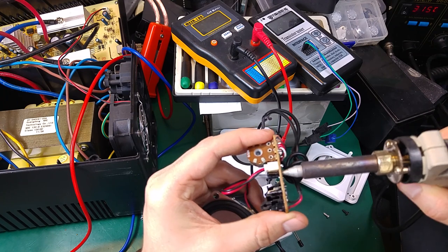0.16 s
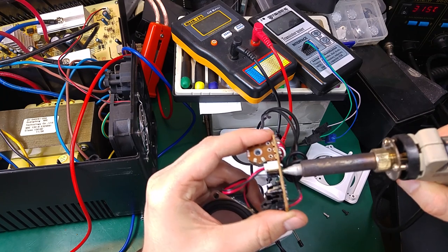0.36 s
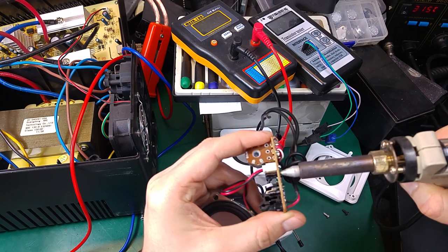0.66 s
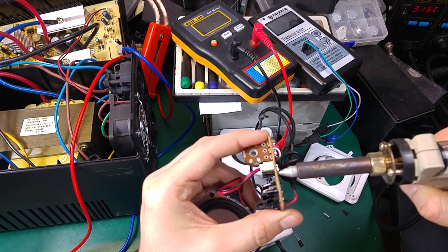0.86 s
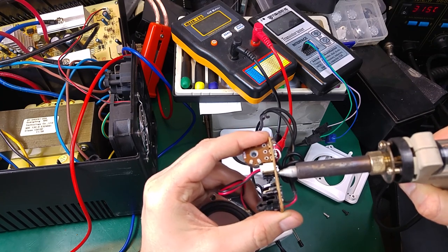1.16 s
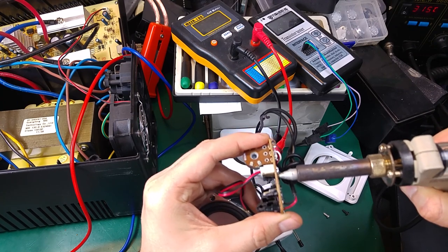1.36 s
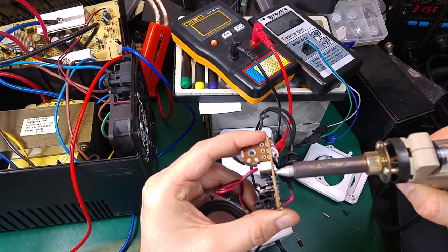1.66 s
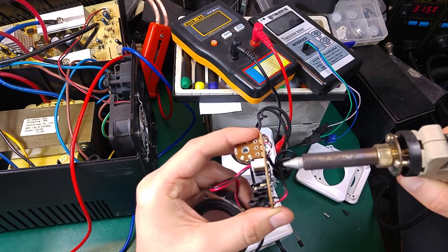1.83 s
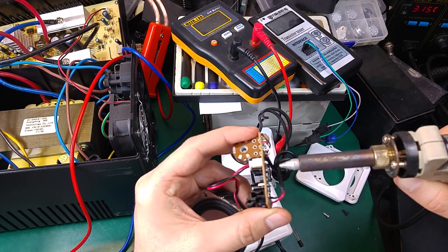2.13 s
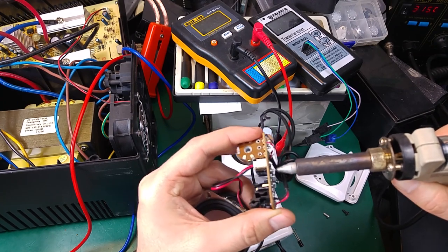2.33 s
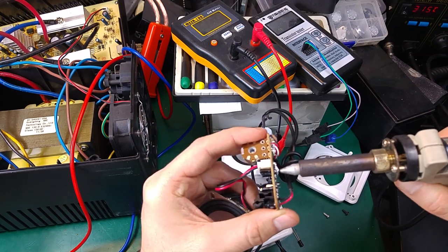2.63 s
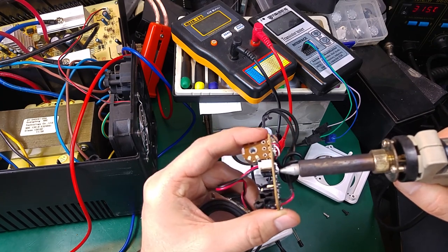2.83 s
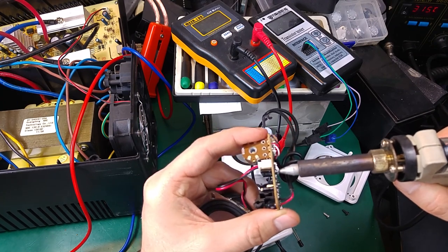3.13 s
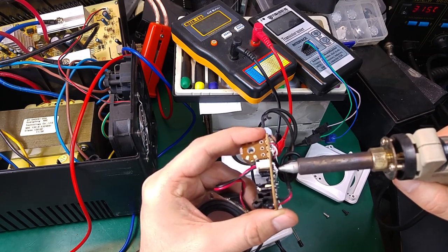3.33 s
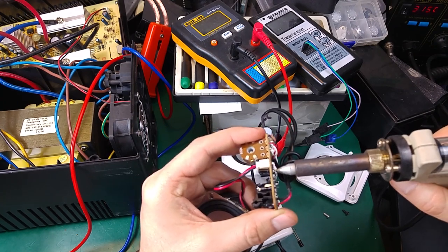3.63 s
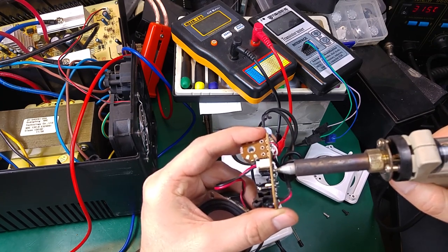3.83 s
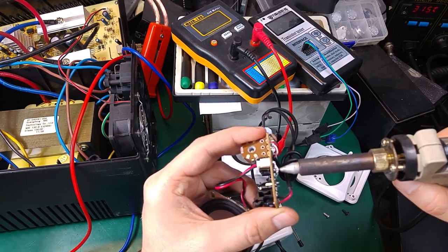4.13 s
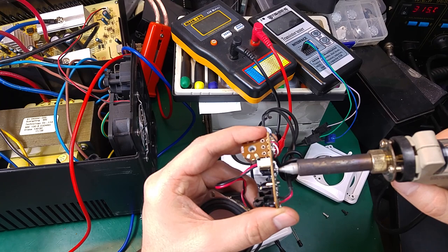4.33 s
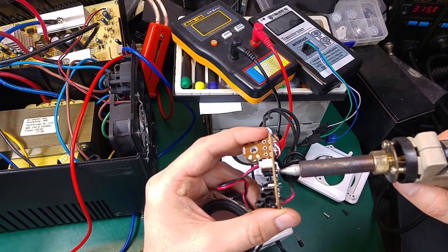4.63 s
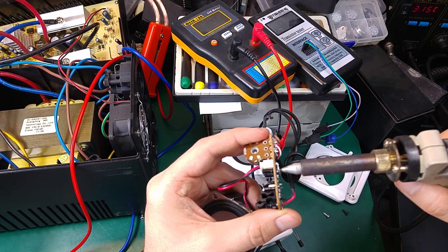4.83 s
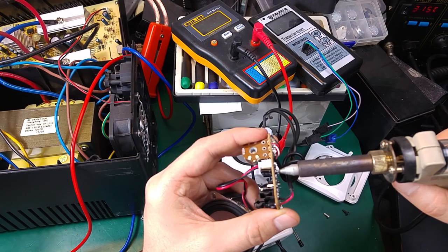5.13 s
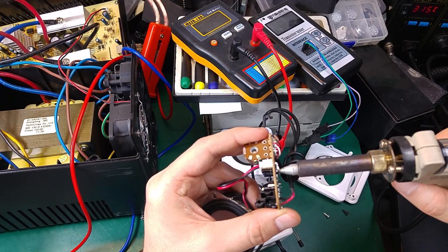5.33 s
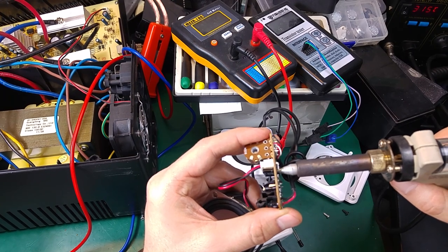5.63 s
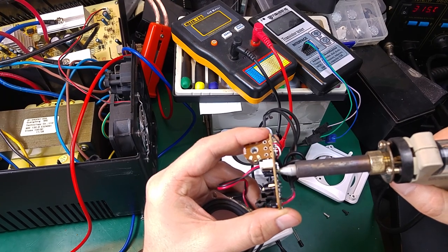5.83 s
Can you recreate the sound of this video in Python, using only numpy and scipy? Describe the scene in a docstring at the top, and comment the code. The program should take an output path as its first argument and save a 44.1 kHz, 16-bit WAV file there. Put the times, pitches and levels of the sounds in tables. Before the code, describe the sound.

Over a steady fan hum, a desoldering gun's trigger clicks, its small pump buzzes hard for about a second, then knocks to a stop.

```python
"""A desoldering gun on a workbench, close to a two-port microphone: the trigger creaks and clicks, the
diaphragm pump runs up and buzzes for about a second as its strokes ring the housing, its crank knocks and air
hisses in puffs; the trigger is let go and the pump knocks to a halt. A cooling fan, hum lines over rushing air,
runs all along; it slows while the pump draws current and then climbs back. Filtered noise bursts make the
clicks. Faint electric ticks, whines and hiss sit in the left channel."""
import sys
import numpy as np
from scipy import signal
from scipy.fft import rfft, irfft, next_fast_len
from scipy.io import wavfile
from scipy.ndimage import uniform_filter1d

SR = 44100
rng = np.random.default_rng(int(sys.argv[2]) if len(sys.argv) > 2 else 0)


def store_pcm(level_fs):
    """Save levels as 16-bit WAV."""
    pcm = np.round(np.clip(level_fs, -1, 1) * 32767).astype(np.int16)
    wavfile.write(sys.argv[1], SR, np.atleast_2d(pcm).T)


N = 263718

# Hum lines of the fan. Each row: multiple of the fan speed, level in dB before the case resonances.
FAN_ORDERS = [(.5, -69), (1, -68), (2, -72), (3, -66), (4, -69), (6, -62), (7, -57), (8, -58)]
# Resonances of the fan case. Each row: centre in Hz, width in Hz, lift in dB.
CASE_MODES = [(104, 11, 18), (227, 6, 23), (453, 12, 14), (760, 40, 22), (786, 12, 5), (845, 30, 9),
              (890, 25, 8)]
# Lower part of the fan's rushing air. Each row: frequency in Hz, relative density in dB per Hz.
DRAUGHT_LOW = [(30, -31), (103, -25.5), (194, -17), (255, -13.5), (330, -4.5), (430, -11), (490, -22.5),
               (570, -19.5), (610, -8), (720, -10), (1120, -5.5), (1260, -21), (1420, -17), (1800, -20.5)]
# Upper part of the fan's rushing air. Each row: frequency in Hz, relative density in dB per Hz.
DRAUGHT_HIGH = [(1800, -21.5), (2280, -22.5), (3410, -27.5), (4310, -25), (4770, -28.5), (6600, -18),
                (7500, -24), (8000, -27), (9770, -37.5), (16000, -52)]
# Resonances in the fan's air. Each row: centre in Hz, width in Hz, lift in dB.
DRAUGHT_MODES = [(382.3, 33, 8), (757.3, 30.4, 10.5), (1584, 110, 9), (2025, 120, 9.5), (3840, 17, 6.5)]

# Moments with no tick on the beat. Each entry: time in seconds.
TICK_GAPS = [.56, 2.61, 2.71, 3.23, 3.64, 3.74, 4.15, 4.25, 5.27, 5.89]
# Ticks off the beat. Each row: start in seconds, peak level in dB.
STRAY_TICKS = [(3.893, -36), (4.139, -33)]
# Thin steady tones in the left channel. Each row: frequency in Hz, mean level in dB.
WHINES = [(8640, -62), (8980, -61.5)]

# Trigger creaking under the finger. Each row: start in seconds, peak in dB ahead of the ports, ring t60 in seconds.
CREAKS = [(.548, -36, .01), (.587, -35, .01), (.596, -34, 0.0091), (.601, -38, .01)]
# Trigger pressed. Each row: start in seconds, peak in dB ahead of the ports, ring t60 in seconds.
PRESSES = [(.672, -9.5, 0.025)]
# Spectrum of the press. Each row: frequency in Hz, relative level in dB.
PRESS_SPECTRUM = [(1500, -19), (3000, -20.5), (3800, -2.5), (5000, -8), (6300, 1.5), (8000, -6), (11500, 2),
                  (15000, -2)]
# Trigger let go. Each row: start in seconds, peak in dB ahead of the ports, ring t60 in seconds.
RELEASES = [(1.797, -5, 0.033), (1.8315, -10.5, 0.021)]
# Spectrum of the release. Each row: frequency in Hz, relative level in dB.
RELEASE_SPECTRUM = [(4000, -19), (5500, -4), (6500, 4), (9000, -4), (12000, -2), (15000, -8.5)]

# What a stroke rings in housing and bench. Each row: frequency in Hz, relative level in dB.
BODY = [(40, -30), (70, -15.5), (140, -7.5), (210, -9.5), (280, -4.5), (420, -4.5), (490, -37.5),
        (560, -26.5), (640, -12.5), (700, -10), (850, -16.5), (1000, -12.5), (1160, -17.5), (1400, -17.5),
        (3600, -39.5)]
# Resonances of housing and bench. Each row: centre in Hz, width in Hz, lift in dB.
BODY_MODES = [(105.3, 27, 17.5), (201.6, 22, 15.5), (358, 11.4, 7.5), (458.5, 4.3, 23.5), (695, 18, 3),
              (763, 63, 20), (896.4, 23, 14.5), (972, 23.6, 15.5), (1065, 15, 19), (1450, 220, 4),
              (2164, 72, 20), (3100, 90, 18.5)]
# Spectrum of the crank knock. Each row: frequency in Hz, relative level in dB.
CRANK = [(200, -29), (330, -48), (430, -23), (520, -40.5), (650, -26), (740, -27), (860, -40.5),
         (980, -8.5), (1080, -6), (1150, -25.5), (1400, -42.5)]
# Resonances the crank excites. Each row: centre in Hz, width in Hz, lift in dB.
CRANK_MODES = [(388, 16, 13), (464.6, 18, 17), (833, 20, -1), (948, 12, 17), (986, 10, 4)]
# Crank knock, strong in the run-up, weaker at steady speed, growing again before switch-off.
# Each row: time in seconds, gain in dB.
CRANK_LEVEL = [(.74, 7), (.84, 3), (.94, 6), (1.12, 6), (1.165, -2), (1.45, -2), (1.79, 3), (1.88, 2),
               (1.95, -13)]
# Air rushing through nozzle and valve. Each row: frequency in Hz, relative density in dB per Hz.
AIR = [(150, -12), (400, -4), (520, -17), (750, 1.5), (1100, -5), (1250, -1), (1490, -6.5), (1700, -10),
       (2400, -11.5), (3990, -16), (6750, -9.5), (10200, -17.5), (13000, -19), (16000, -17)]
# Resonances of the air path. Each row: centre in Hz, width in Hz, lift in dB.
AIR_MODES = [(2115, 96, 14.5), (3057, 78, 13), (3400, 150, 7.5), (4940, 180, 4), (6560, 310, 6.5),
             (7100, 400, 4)]
# Last strokes of the stopping pump. Each row: start in seconds, level in dB ahead of the ports.
KNOCKS = [(1.9143, -13), (1.9645, -18), (1.991, -26)]

# The microphone ports. Each row: frequency in Hz, left minus right in dB, left lead in radians, room share in dB.
PORTS = [(65, -11, 1, -24), (141, -6, 1.5, -25), (222, -6, 0.66, -50), (295, -3.5, 0.53, -52),
         (420, -0.5, 0.5, -38), (604, 2.5, -0.2, -8.5), (750, 1.5, 0.67, -21.5), (1100, 1.5, -1.5, -4),
         (1440, -5, -2.5, -2), (2720, -2.5, -5, -8.5), (4830, -9, -4.5, -9.5), (8160, -7, -4.5, -14),
         (15000, -7.5, -4.5, -2)]
# Share of a rushing sound that only one port hears. Each row: frequency in Hz, share of power from 0 to 1.
APART = [(300, 0.14), (1000, 0.21), (2000, 0.66), (6000, 0.58), (15000, 0.7)]

# fan: free speed, deepest sag under load, time constants of slowing and of recovery
FAN_HZ, FAN_SAG_HZ, FAN_SLOWS_S, FAN_RECOVERS_S = 113.3, 17, .3, .42
DRAUGHT_DB = -38.5  # rms
TICK_FIRST_S, TICK_EVERY_S = .0515, .102405
TICK_DB, TICK_SCATTER_DB = -36, 2
HISS_DB = -67.5  # rms
# pump speed: the motor jumps, then creeps up to full rate
POWER_ON_S, FIRST_STROKE_S, FULL_RATE_HZ = .69, .712, 70.25
JUMP, CREEP = (6, .03), (13.5, .23)  # Hz still missing at switch-on, time constant in s
POWER_OFF_S, RUN_DOWN_S = 1.803, 0.26
# pump level: full stroke level, lack as it takes hold, attack, settling
STROKE_DB, WEAK_START_DB, ATTACK_S, SETTLE_S = -20, 3.5, 0.029, 0.15
# after switch-off the treble hiss dies more slowly than the strokes
FALL_DB_PER_S, HISS_FALL_DB_PER_S = 166, 95
AIR_DB, AIR_SPLIT_HZ = -3.5, 1600  # rms against the strokes
# below the split the rush is stronger while the pump spins up, weaker once it runs evenly
AIR_LOW_DB, AIR_LOW_START_DB, AIR_LOW_SETTLE_S = -10, 10, 0.65
ROOM_T60_S = 0.37
LOW_HZ, TOP_HZ = 45, 15680  # recorder band


def undb(db):
    """Turns dB into an amplitude factor."""
    return 10 ** (np.asarray(db) / 20)


def unit(x):
    """Scales to rms 1."""
    return x / np.sqrt(np.mean(x ** 2))


def along(table, at, scale=lambda v: v):
    """Columns of a table joined by straight lines."""
    first, *columns = np.transpose(table)
    return [np.interp(scale(at), scale(first), c) for c in columns]


def peaks_db(hz, modes):
    """Lift in dB that a set of resonances gives at these frequencies."""
    return sum(db / (1 + (2 * (hz - f) / width) ** 2) for f, width, db in modes)


def colour(x, points, modes=(), size=8192):
    """Causal filter with this spectrum (from the folded cepstrum); steep below and above the points."""
    hz = np.arange(size // 2 + 1) * SR / size + 1
    below = (points[0][0] / 2, points[0][1] - 30)
    above = (points[-1][0] * 2, points[-1][1] - 40)
    level_db = along([below] + list(points) + [above], hz, np.log)[0] + peaks_db(hz, modes)
    ceps = irfft(level_db * np.log(10) / 20)
    ceps[1:size // 2] *= 2
    ceps[size // 2 + 1:] = 0
    response = irfft(np.exp(rfft(ceps)))
    response = response.reshape((1,) * (x.ndim - 1) + (-1,))
    return signal.fftconvolve(x, response, axes=-1)[..., :N]


def walk(rate):
    """Smooth random drift, spread about 0.7: random levels held 1 / rate s and smoothed twice."""
    k = int(SR / rate)
    steps = np.repeat(rng.standard_normal(N // k + 1), k)
    return 0.98 * uniform_filter1d(uniform_filter1d(steps, k), k)[:N]


def pulses(turns, jitter, scatter_db):
    """One impulse at every whole turn, split between two samples, a little uneven in time and size."""
    whole = np.arange(1, int(turns[-1]))
    chance = rng.standard_normal((len(whole), 2))
    place = np.interp(whole + jitter * chance[:, 0], turns, np.arange(N))
    size = undb(scatter_db * chance[:, 1])
    i = place.astype(int)
    out = np.zeros(N + 1)
    np.add.at(out, i, size * (1 - place + i))
    np.add.at(out, i + 1, size * (place - i))
    return out[:N]


def bursts(events, points):
    """A sharp crack with a weaker noisy ring after it, at the given peaks."""
    out, t = np.zeros(N), np.arange(SR // 10) / SR
    for s, db, t60 in events:
        shape = undb(-60 * t / .003) + .45 * undb(-60 * t / t60)
        burst = colour(rng.standard_normal(len(t)) * shape, points, size=512)[:len(t)]
        i = int(s * SR)
        out[i:i + len(t)] += undb(db) * burst / np.abs(burst).max()
    return out


def noise_pair():
    """Noise for both ports: alike in the bass, more apart in the treble."""
    both, left, right = rfft(rng.standard_normal((3, N)))
    hz = np.arange(len(both)) * SR / N + 1
    share = np.clip(along(APART, hz, np.log)[0], 0, 1)
    return irfft(np.sqrt(1 - share) * both + np.sqrt(share) * np.array([left, right]), N)


def fan(t):
    """Hum lines that swell when they cross a resonance of the case, over rushing air."""
    loaded = np.clip(t, POWER_ON_S, POWER_OFF_S) - POWER_ON_S
    off = np.maximum(t - POWER_OFF_S, 0)
    sag_hz = FAN_SAG_HZ * (1 - np.exp(-loaded / FAN_SLOWS_S)) * np.exp(-off / FAN_RECOVERS_S)
    hz = FAN_HZ - sag_hz + 0.16 * walk(3.05)
    turns = np.cumsum(hz) / SR
    hum = np.zeros(N)
    for k, db in FAN_ORDERS:
        line_db = db + peaks_db(k * hz, CASE_MODES) + 1.3 * walk(4)
        hum += undb(line_db) * np.sin(2 * np.pi * k * turns)
    low = colour(noise_pair() * undb(1.05 * walk(6.78)), DRAUGHT_LOW, DRAUGHT_MODES)
    high = colour(noise_pair() * undb(.6 * walk(25)), DRAUGHT_HIGH, DRAUGHT_MODES)
    return hum + undb(DRAUGHT_DB) * unit(low + high)


def electronics(t):
    """Ticks on a steady beat and off it, thin whines and treble hiss of the left channel."""
    beat = np.arange(TICK_FIRST_S, t[-1] - .1, TICK_EVERY_S)
    beat_db = TICK_DB + TICK_SCATTER_DB * rng.standard_normal(len(beat))
    heard = np.abs(beat[:, None] - np.array(TICK_GAPS)).min(axis=1) > TICK_EVERY_S / 2
    events = list(zip(beat[heard], beat_db[heard])) + list(STRAY_TICKS)
    ticks = bursts([(s, db, .008) for s, db in events], [(6000, -5), (9000, -6), (15000, -8)])
    whines = sum(undb(db + 2 * walk(4.6)) * np.sin(2 * np.pi * hz * t) for hz, db in WHINES)
    hiss = unit(colour(rng.standard_normal(N), [(8000, -22), (14000, 4), (15500, 3)]))
    return ticks + whines + undb(HISS_DB) * hiss


def trigger_creaks():
    """Small noise bursts centred near 3.5 kHz as the trigger creaks under the finger."""
    return bursts(CREAKS, [(2500, -12), (3500, 2), (4800, -11)])


def trigger_press():
    """A bright crack and short ring as the trigger is pressed."""
    return bursts(PRESSES, PRESS_SPECTRUM)


def pump_strokes(turns, hz):
    """Regular strokes ring housing and bench."""
    strokes = colour(-pulses(turns, .0012, .3), BODY, BODY_MODES)
    # the shaking force grows with speed, so the bass swells in late
    bass = signal.sosfiltfilt(signal.butter(2, 260, fs=SR, output="sos"), strokes)
    return strokes + bass * ((hz / 70) ** 4 - 1)


def pump_crank(turns, t):
    """The crank knocks one way on a stroke, the other on the next: its lines fall between the stroke harmonics."""
    one_way = pulses(turns / 2 + .01, .0006, .4)
    other_way = pulses(turns / 2 + .51, .0006, .4)
    return undb(along(CRANK_LEVEL, t)[0]) * colour(one_way - other_way, CRANK, CRANK_MODES)


def pump_air(turns):
    """Noise of air through nozzle and valve; the rush pulses once, twice and four times per stroke."""
    puffs = 1 + 0.2 * np.cos(2 * np.pi * turns)
    puffs += 0.085 * np.cos(4 * np.pi * turns + 0.63)
    puffs += 0.16 * np.cos(8 * np.pi * turns)  # from the motor
    return unit(colour(noise_pair() * puffs * undb(0.74 * walk(39.2)), AIR, AIR_MODES))


def pump(t):
    """One motor speed drives strokes, crank and air; without power the motor runs down and they fade."""
    on, off = np.maximum(t - POWER_ON_S, 0), np.maximum(t - POWER_OFF_S, 0)
    hz = FULL_RATE_HZ - sum(lack * np.exp(-on / tau) for lack, tau in (JUMP, CREEP))
    hz = hz * np.exp(-off / RUN_DOWN_S)
    turns = np.cumsum(hz) / SR
    turns = turns + 1 - np.interp(FIRST_STROKE_S, t, turns) % 1

    strokes = pump_strokes(turns, hz)
    running = (t > POWER_ON_S) & (t < POWER_OFF_S)
    body = (strokes + pump_crank(turns, t)) / np.std(strokes[running])
    air = undb(AIR_DB) * pump_air(turns)
    low_air = signal.sosfiltfilt(signal.butter(2, AIR_SPLIT_HZ, fs=SR, output="sos"), air)
    low_air_db = AIR_LOW_DB + AIR_LOW_START_DB * np.exp(-on / AIR_LOW_SETTLE_S)
    rumble = undb(-FALL_DB_PER_S * off) * (body + undb(low_air_db) * low_air)
    hiss = undb(-HISS_FALL_DB_PER_S * off) * (air - low_air)
    level = np.minimum(on / ATTACK_S, 1) ** 2 * undb(STROKE_DB - WEAK_START_DB * np.exp(-on / SETTLE_S))
    return level * (rumble + hiss)


def trigger_release():
    """Bright cracks with short rings as the trigger is let go."""
    return bursts(RELEASES, RELEASE_SPECTRUM)


def knocks():
    """The last strokes thud once each: a snap together with a short ring of the housing."""
    out, t = np.zeros(N), np.arange(SR // 20) / SR
    thud = np.sin(2 * np.pi * 900 * t) * np.minimum(t / .0008, 1) * undb(-60 * t / .009)
    snap = .9 * np.sin(2 * np.pi * 2300 * t) * undb(-60 * t / .003)
    for s, db in KNOCKS:
        i = int(s * SR)
        out[i:i + len(t)] += undb(db) * (thud + snap)
    return out


def ports(x):
    """Each port hears the direct sound with its own level and phase, and its own share of the room."""
    size = next_fast_len(N + SR)
    hz = np.arange(size // 2 + 1) * SR / size + 1
    pan_db, lead, room_db = along(PORTS, hz, np.log)
    t = np.arange(SR // 2) / SR
    # decaying noise as the room, starting 3 ms after the direct sound
    tails = rng.standard_normal((2, len(t))) * undb(-60 * t / ROOM_T60_S) * (t > .003)
    tails = rfft(tails / np.sqrt(np.sum(tails ** 2, axis=1, keepdims=True)), size)
    side = np.array([[.5], [-.5]])
    direct_and_room = np.exp(1j * side * lead) + undb(room_db) * tails
    gain = undb(side * pan_db) * direct_and_room / np.sqrt(1 + undb(2 * room_db))
    return irfft(rfft(x, size) * gain, size)[:, :N]


def scene():
    """Gun and fan reach both ports; the electronics enter the left channel only."""
    t = np.arange(N) / SR
    trigger = trigger_creaks() + trigger_press() + trigger_release()
    gun = trigger + pump(t) + knocks()
    out = ports(fan(t) + gun)
    out[0] += electronics(t)
    return out


def record(dry):
    """The recorder drops the deep bass and cuts the top."""
    thin = signal.sosfilt(signal.butter(4, LOW_HZ, "high", fs=SR, output="sos"), dry)
    return signal.sosfilt(signal.ellip(14, .2, 80, TOP_HZ, fs=SR, output="sos"), thin)


dry = scene()
out = record(dry)
store_pcm(out)
```